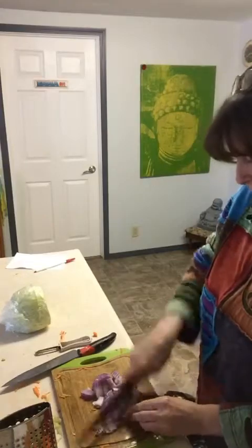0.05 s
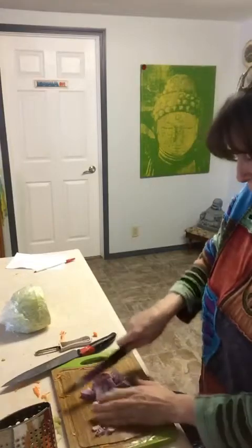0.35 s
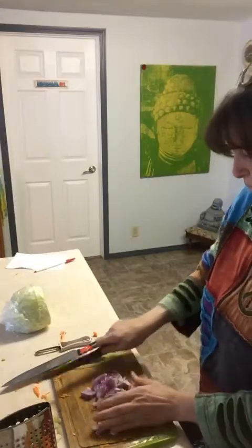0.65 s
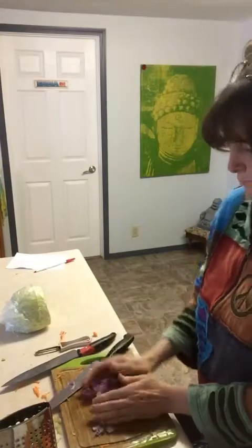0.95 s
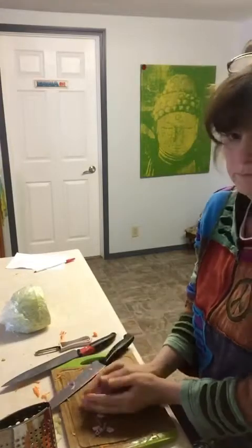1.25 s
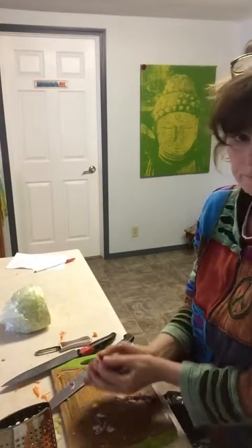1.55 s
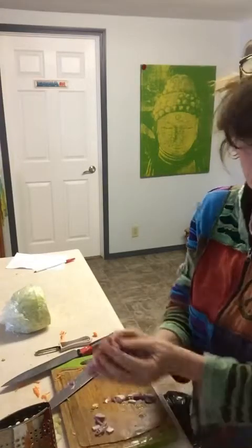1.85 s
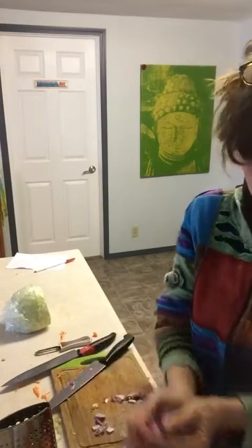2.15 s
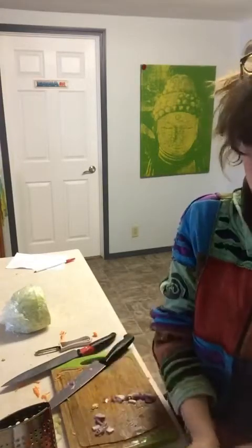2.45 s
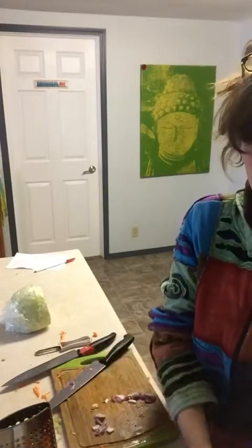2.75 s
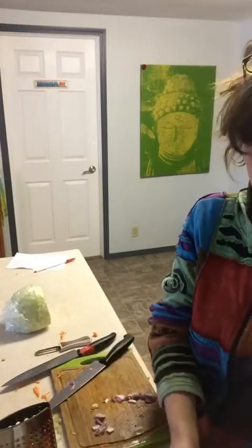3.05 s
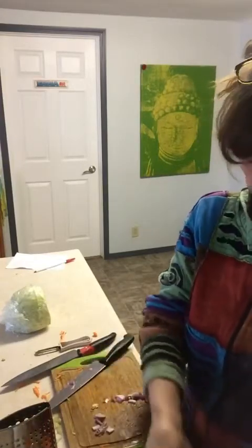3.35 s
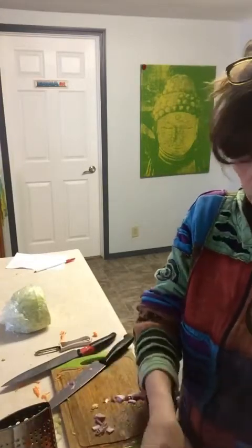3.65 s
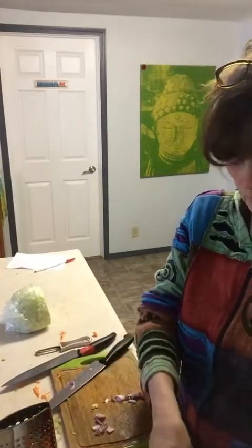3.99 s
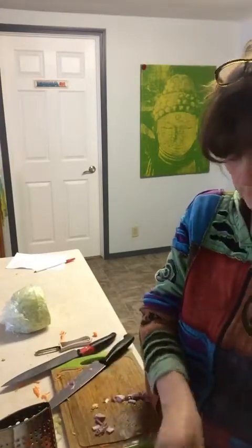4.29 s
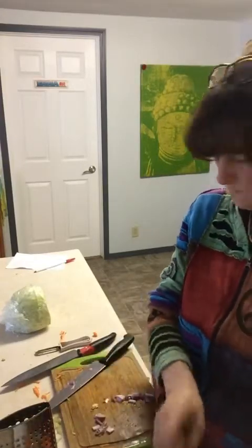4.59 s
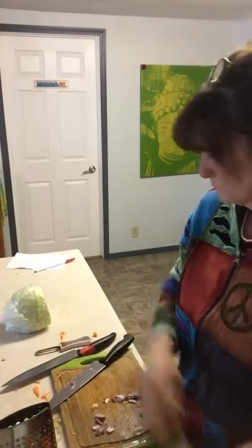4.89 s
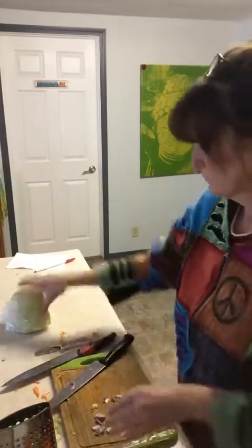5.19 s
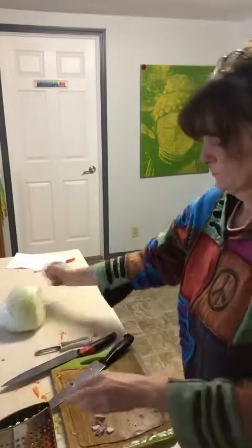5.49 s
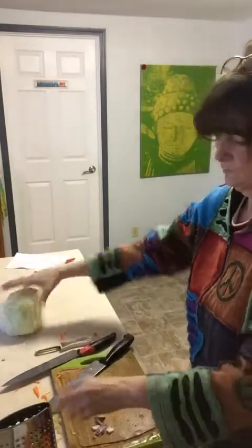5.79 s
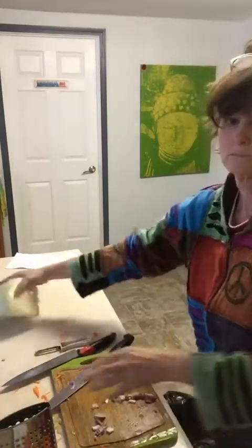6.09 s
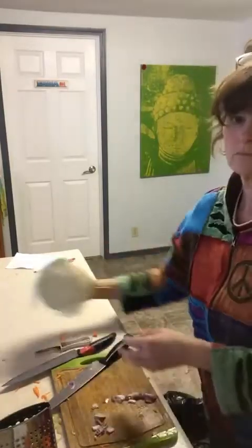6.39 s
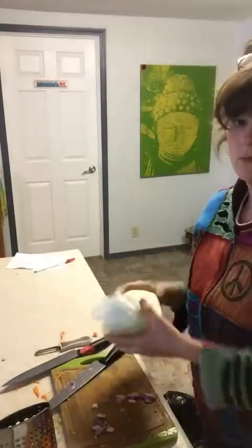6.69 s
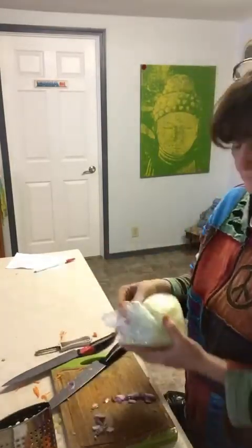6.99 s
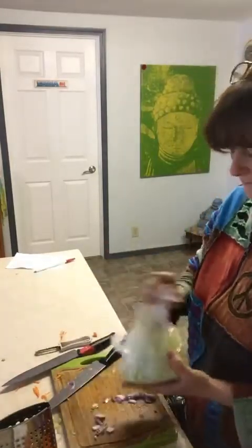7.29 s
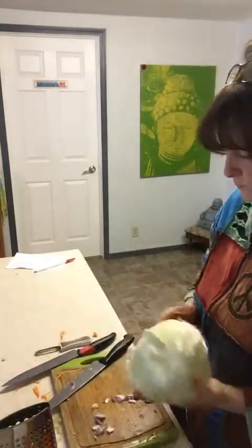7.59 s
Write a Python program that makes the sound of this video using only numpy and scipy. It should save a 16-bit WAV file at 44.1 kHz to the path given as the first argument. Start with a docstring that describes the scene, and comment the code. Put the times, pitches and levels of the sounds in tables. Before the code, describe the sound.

Close kitchen sounds: a steel knife set down on wood, soft scraps dropping into a lined bin, a dull thump and crinkling plastic film.

```python
"""A kitchen knife is put down with a clatter on a wooden board: the wood knocks and the steel rings.
Blade and hand scrape the board, then wet onion scraps patter into a lined bin and fingers rub clean.
A cabbage in plastic film thumps on the table and rocks, then crinkles as it is unwrapped.
All of it is close by, in a bare room with a few soft low thumps and a faint fridge hum."""
import sys
import numpy as np
from scipy import signal
from scipy.fft import rfft, irfft, next_fast_len
from scipy.io import wavfile
from scipy.ndimage import uniform_filter1d

SR = 44100
rng = np.random.default_rng(int(sys.argv[2]) if len(sys.argv) > 2 else 0)


def store_wav(level_fs):
    """Save 16-bit WAV to argv[1]."""
    pcm = np.round(np.clip(np.atleast_2d(level_fs), -1, 1) * 32767)
    wavfile.write(sys.argv[1], SR, pcm.T.astype(np.int16))


N = 336915
T = np.arange(N) / SR
ONE_SECOND = T[:SR]  # time axis of a single knock


def knife(crack_t60=0.023, thud_t60=0.18, load_s=0.0018, held_db=-30, free_db=-13, room_db=-11):
    """Handle and blade knock and bounce on the board. Returns the near sound and the room's share."""
    # each contact: t/s, level/dB, low cut/Hz, high cut/Hz, ring length/factor, relative table thud/dB
    contacts = [(0.2882, -56.5, 1800, 2000, 0.99, -30), (0.831, -12.5, 600, 2000, 0.88, -20),
                (0.8539, -26.5, 900, 2607, 1.9, -11), (0.9004, -36, 1000, 2030, 0.45, -1.5),
                (0.9284, -20.5, 3726, 6710, 1, -15), (0.9462, -28, 897, 2600, 0.38, -27),
                (.9530, -21, 1300, 2600, 0.69, -30), (0.9562, -18.5, 1200, 2600, 0.43, -28.5)]
    # dull tones of wood and handle: f/Hz, level/dB, t60/s (time to fade by 60 dB)
    board_tones = [(310, -21, 0.043), (600, -26.5, .07), (880, -11, .035), (1039, -9, 0.033),
                   (1265, -14.5, 0.027), (1470, 1.5, 0.019), (1760, -15, .02), (1957, -2.5, 0.022),
                   (2305, -10.5, .02), (2750, -1.5, 0.0081), (3530, -4.5, .009), (4190, -4, .007),
                   (4950, -4, .007), (5700, -5.5, .006), (6430, -6.5, 0.0088)]
    # ringing tones of the steel: f/Hz, level/dB, t60/s
    blade_tones = [(922, -9, .35), (953.3, 1.5, 0.47), (1027, -5.5, .4), (1270, -7, 0.43), (1254, -9.5, .3),
                   (1509, -13, .3), (1561, -14.5, 0.37), (1700, -12.5, 0.29), (1850, -9.5, 0.25),
                   (2120, -14, .35)]
    near, to_room = np.zeros(N), np.zeros(N)
    blade = unit_attack(ring(blade_tones))
    for start, db, low_hz, high_hz, length, thud_db in contacts:
        blade_db = free_db if start == contacts[-1][0] else held_db  # the hand lets go at the last one
        crack = cut(cut(noise(SR), 800, "high"), 7000, "low", order=1)
        crack *= undb(-2) * fade(crack_t60 * length)
        knock = ring(board_tones, length) + crack
        knock = cut(cut(knock, low_hz, "high", order=1), high_hz, "low")
        knock = unit_attack(knock * swell(load_s))  # the push on the wood takes a moment to build
        knock += undb(-32.5) * fade(0.042) * noise(SR)  # crumbs crushed under the knife
        rumble = cut(cut(noise(SR), 340, "low", order=3), 93, "high")
        thud = unit(rumble) * fade(thud_t60)
        add(near, start, undb(db) * (knock + undb(thud_db) * thud + undb(blade_db) * blade))
        add(to_room, start, undb(db + room_db) * knock)
    return near, to_room


def scrapes():
    """Blade and onion pieces catch on the grain of the wood thousands of times a second."""
    # each slide: full speed at t/s, level/dB, rise/s, hold/s, fall/s, treble lift/dB
    slides = [(0.0, -48, .01, 0.099, 0.018, 1.5), (1.219, -58, 0.17, 0.079, .08, 7),
              (1.37, -51, 0.043, 0.019, 0.034, 10.5)]
    # tone of rubbed wood: f/Hz, level/dB
    wood_colour = [(100, -6), (200, -1.5), (350, -4.5), (550, -14), (820, 0.5), (1100, 5), (1450, 0),
                   (1800, -4), (2600, -5), (5000, -18), (9000, -25.5), (15000, -35)]
    rub = unit(colour(clicks(per_second=4400, spread_db=3), wood_colour))
    return sum(undb(db) * stroke(at, rise, hold, fall) * brighten(rub, treble_db, corner_hz=4300)
               for at, db, rise, hold, fall, treble_db in slides)


def cabbage(crunch_t60=0.08, crunch_db_per_octave=6.5):
    """The cabbage lands, bounces and rocks; softer pushes sound duller and crunch the leaves less."""
    # each push on the table: t/s, thud level/dB, high cut/Hz
    pushes = [(5.328, -48.5, 60), (5.3544, -43, 55), (5.5731, -17.5, 1000), (5.589, -26.5, 600),
              (5.605, -25, 240), (5.619, -24, 200), (5.6455, -28.5, 1330), (5.671, -24, 140),
              (5.727, -36, 65), (5.803, -44.5, 180), (5.829, -43.5, 65), (5.88, -51.5, 200),
              (5.96, -50.5, 55.5)]
    # tones of the table top: f/Hz, level/dB, t60/s
    table_tones = [(68.7, -6, 0.25), (100.3, -9, 0.13), (140, -8, 0.18), (198, -8.5, 0.051),
                   (221.6, -15.5, 0.2), (299, 7.5, 0.033), (368, 8, 0.014), (578, -2, 0.03),
                   (649, -9, 0.03)]
    # tone of crunching leaves: f/Hz, level/dB
    leaf_colour = [(350, -29), (600, -4), (780, -5), (900, -4), (1250, -1), (1600, -5), (1900, -2.5),
                   (2600, -10.5), (3200, -12.5), (3700, -11), (5000, -23), (6400, -22.5), (8000, -31.5),
                   (10500, -31), (15500, -29)]
    out = np.zeros(N)
    for start, thud_db, push_hz in pushes:
        thud = cut(cut(ring(table_tones), push_hz, "low"), 57, "high")
        loudest = np.sqrt(np.max(uniform_filter1d(thud ** 2, size=SR // 100)))
        add(out, start, undb(thud_db) * thud / loudest)
        crunch = unit_attack(colour(noise(SR), leaf_colour) * fade(crunch_t60))
        crunch_db = thud_db - 4 + crunch_db_per_octave * np.log2(push_hz / 1000)
        add(out, start, undb(crunch_db) * crunch)
    return out


def film(snap_t60=0.01):
    """Plastic film crinkles as it is brushed and pulled off; a few large folds snap through."""
    # tone of the film: f/Hz, level/dB
    film_colour = [(100, -32), (220, -13), (340, -9), (450, -17), (720, -15.5), (1200, -7), (2000, -3.5),
                   (2600, -4), (3800, -3.5), (5000, -6.5), (6400, -5), (10400, -15.5), (13700, -12.5),
                   (15800, -16.5)]
    # loudness of the unwrapping: t/s, level/dB
    pull = [(6.81, -72), (6.922, -53.5), (7.018, -56), (7.03, -49.5), (7.204, -45.5), (7.212, -36.5),
            (7.408, -36.5), (7.448, -45.5), (7.518, -35.5), (7.534, -45.5), (7.64, -41)]
    # hands and table brush it: full speed at t/s, level/dB, rise/s, hold/s, fall/s, treble change/dB
    touches = [(5.363, -59, 0.073, 0.056, .11, 1), (5.562, -38, 0.025, 0.023, 0.029, -1),
               (5.957, -54, 0.0093, 0.0078, 0.049, 6.5), (5.997, -63, 0.038, 0.059, 0.27, -2),
               (6.255, -58, 0.051, 0.033, 0.037, 8.5), (6.702, -46, .02, 0.0046, 0.015, -3.5),
               (6.709, -57, 0.14, 0.05, .05, 1.5)]
    # large folds: t/s, level/dB, treble change/dB
    snaps = [(5.482, -44, 7.5), (7.2123, -45, -9), (7.25, -35, 6), (7.344, -38, -12), (7.3745, -30.5, -21),
             (7.3985, -37.5, -20), (7.4971, -38, 5), (7.6066, -39, -5)]
    crinkle = unit(colour(small_folds(), film_colour))
    pull_db = np.interp(T, *np.transpose(pull), left=-150, right=-150)
    out = undb(pull_db) * brighten(crinkle, db=2)
    for at, db, rise, hold, fall, treble_db in touches:
        out += undb(db) * stroke(at, rise, hold, fall) * brighten(crinkle, treble_db)
    for start, db, treble_db in snaps:
        snap = brighten(colour(noise(SR), film_colour), treble_db) * fade(snap_t60)
        add(out, start, undb(db) * unit_attack(snap))
    return out


def small_folds(hiss_db=-7, bunch_db=1.14, bunch_hz=55, flicker_db=3, flicker_hz=35):
    """Countless tiny folds of film buckle in bunches over a sliding hiss."""
    crackle = unit(unit(clicks(per_second=2600, spread_db=3)) + undb(hiss_db) * noise(N))
    crackle *= undb(bunch_db * wander(bunch_hz))
    # folds of different sizes come and go, so each half octave swells on its own
    bands_hz = np.geomspace(700, 16000, 10)
    size = next_fast_len(N, True)
    spectrum, out = rfft(crackle, size), np.zeros(N)
    freqs = np.linspace(0, SR / 2, len(spectrum))
    for share in np.eye(len(bands_hz)):
        band = irfft(spectrum * np.interp(freqs, bands_hz, share), size)[:N]
        out += band * undb(flicker_db * wander(flicker_hz))
    return out


def scraps(pat_t60=0.037, splash_db=-28):
    """Wet pieces pat on the bin liner, each with its own pitch; heavy lumps make the bin ring."""
    # falling pieces: t/s, level/dB, centre f/Hz, width/octaves
    pieces = [(2.5448, -58.5, 1370, 0.38), (2.6070, -50.5, 2200, 0.46), (2.6280, -55, 1720, 0.11),
              (2.6924, -36.5, 2310, 0.69), (2.7079, -42.5, 1740, 0.095), (2.7508, -49.5, 1500, 2.1),
              (2.795, -59.5, 2800, 0.44), (2.8668, -52, 3410, 1.03), (3.1047, -52, 2420, 0.83),
              (3.2863, -56, 3900, 0.39), (3.3299, -55.5, 3120, 0.65), (3.495, -53, 2270, 0.67),
              (3.926, -63.5, 2600, 1), (4.143, -63, 3500, .85)]
    # tone of the liner: f/Hz, level/dB
    liner_colour = [(1000, 7), (3200, 3), (4500, 1.5), (6500, 4), (9500, -1.5), (13000, 3.5), (16000, 2)]
    # heavy lumps landing: t/s, level/dB
    lumps = [(2.696, -45), (2.75, -50)]
    # tones of the bin: f/Hz, level/dB, t60/s
    bin_tones = [(138, -6, 0.2), (320, 5, 0.045), (488, 0, 0.11), (623, -1, 0.13), (756, -7, .1),
                 (1025, -2, 0.14), (1145, 9.5, 0.051)]
    out, octave = np.zeros(N), np.log2(np.arange(SR // 2 + 1) + 1)
    for start, db, hz, width in list(pieces) + crumbs():
        distance = (octave - np.log2(hz)) / width
        hump = np.exp(-distance ** 2 / 2) + undb(splash_db)  # one pitch range over a faint wide splash
        pat = colour(irfft(rfft(noise(SR)) * hump), liner_colour)
        add(out, start, undb(db) * unit_attack(pat * fade(pat_t60)))
    for start, db in lumps:
        add(out, start, undb(db) * unit_attack(ring(bin_tones)))
    return out


def crumbs(gap_s=0.03, centre_hz=3000, scatter_octaves=0.25, width_octaves=1):
    """Small bits fall at uneven moments and pitches. Returns more pieces for scraps()."""
    # spells of trickling: start/s, end/s, level/dB
    trickles = [(2.66, 2.86, -58.5), (3.309, 3.37, -60), (4.089, 4.19, -67)]
    pieces = []
    for start, end, db in trickles:
        for slot in np.arange(start, end, gap_s):
            lands = slot + gap_s * rng.random()
            hz = centre_hz * 2 ** (scatter_octaves * rng.standard_normal())
            pieces.append((lands, db, hz, width_octaves))
    return pieces


def fingers(rub_db=-62.5):
    """Wet fingers rub off the last scraps; the skin sticks and slips in rising squeaks."""
    # the rubbing movement: full speed at t/s, rise/s, hold/s, fall/s
    movement = (3.38, .3, .05, .16)
    # tone of rubbed skin: f/Hz, level/dB
    skin_colour = [(1200, -4), (2300, -9), (3700, -4), (5300, -5), (7000, -5), (9000, -12.5), (11000, -15),
                   (13400, -3), (15200, -9.5), (15800, -9)]
    # squeaks: middle t/s, level/dB, starting f/Hz, climb/Hz, length/s, pitch wobble/fraction
    squeaks = [(3.391, -65.5, 3210, 2570, 0.22, 0.08), (3.508, -56, 2084, 100, 0.06, 0.11),
               (4.131, -61.5, 3140, 446, 0.064, 0.04)]
    rub = unit(colour(clicks(per_second=3200, spread_db=4.5), skin_colour))
    out = undb(rub_db) * stroke(*movement) * rub
    for middle, db, hz, climb_hz, length, wobble in squeaks:
        progress = np.linspace(0, 1, int(length * SR))
        slip = 1 + wobble * wander(592, SR)[:len(progress)]
        pitch_hz = (hz + climb_hz * progress) * slip
        squeak = np.sin(np.pi * progress) * np.sin(2 * np.pi * np.cumsum(pitch_hz) / SR)
        add(out, middle - length / 2, undb(db) * squeak)
    return out


def low_thumps(boom_hz=66, boom_t60=0.24):
    """Soft low thumps from the knife's knocks, landing lumps, footfalls and other small bumps."""
    # soft bumps: t/s, level/dB
    bumps = [(0.0, -39.5), (.06, -48), (0.501, -51.5), (.86, -40), (.94, -43.5), (1.171, -51), (2.715, -45),
             (2.767, -47.5), (3.489, -50.5), (3.807, -46), (3.938, -51.5)]
    out = np.zeros(N)
    boom = cut(np.sin(2 * np.pi * boom_hz * ONE_SECOND) * fade(boom_t60), 160, "low")
    for start, db in bumps:
        add(out, start, undb(db) * boom)
    return out


def room(build_s=0.0036):
    """How bare walls answer a click: a few echoes and a dense tail whose top treble dies first."""
    # how long the room rings: f/Hz, t60/s
    ring_times = [(100, 0.29), (400, 0.46), (1200, 0.46), (2500, 0.37), (4500, .45), (6500, 0.48),
                  (9000, .28), (15000, 0.11)]
    # echoes off walls and ceiling: delay/s, level/dB
    echoes = [(.0095, -6), (0.0226, -9.5), (0.0311, -11.5)]
    hz, t60s = np.transpose(ring_times)
    spectrum, log_freqs = rfft(noise(SR)), np.log(np.arange(SR // 2 + 1) + 1)
    tail = sum(irfft(spectrum * np.interp(log_freqs, np.log(hz), share)) * fade(t60)
               for share, t60 in zip(np.eye(len(hz)), t60s))
    tail = unit(tail * swell(build_s)) / np.sqrt(SR)
    for delay, db in echoes:
        add(tail, delay, undb(db) * np.hanning(5) / 2)
    return tail


def air_and_fridge(air_db=-64, waver=0.3):
    """Still room air and the wavering hum of a fridge."""
    # tone of the air: f/Hz, level/dB
    air_colour = [(15, -58.5), (25, -32), (48, -3.5), (68, -5), (82, -9.5), (102, -5), (241, -6.5),
                  (269, -11.5), (352, -6), (437, -12.5), (486, -13.5), (769, -15.5), (1360, -21.5),
                  (1930, -22.5), (15800, -37)]
    # tones of the fridge: f/Hz, level/dB
    hum_tones = [(59.2, -69.5), (118.5, -80.5), (172.3, -77.5), (204.6, -77), (242.2, -79), (354.5, -75),
                 (705.2, -81.5), (764.4, -79.5)]
    out = undb(air_db) * unit(colour(noise(N), air_colour))
    for hz, db in hum_tones:
        drift = wander(3)
        out += undb(db) * np.sqrt(2) * (1 + waver * drift) * np.sin(2 * np.pi * hz * T + drift)
    return out


def undb(db):
    """Turn decibels into a gain."""
    return 10 ** (np.asarray(db) / 20)


def unit(x):
    """Scale to an average (rms) level of 1."""
    return x / np.sqrt(np.mean(x ** 2))


def unit_attack(x):
    """Scale a knock so its first hundredth of a second has an average level of 1."""
    return x / np.sqrt(np.mean(x[:SR // 100] ** 2))


def noise(samples):
    """An even hiss (white noise)."""
    return rng.standard_normal(samples)


def wander(hz, samples=N):
    """A random wobble, mostly slower than hz."""
    return unit(cut(noise(samples), hz, "low"))


def clicks(per_second, spread_db):
    """Tiny clicks at random moments, most of them small."""
    hits = rng.random(N) < per_second / SR
    signs = rng.choice([-1, 1], N)
    return hits * signs * undb(spread_db * np.minimum(rng.exponential(size=N), 4))


def ring(tones, length=1):
    """Fading tones struck together; neighbours swing in opposite directions."""
    return sum((-1) ** k * undb(db) * fade(t60 * length) * np.sin(2 * np.pi * hz * ONE_SECOND)
               for k, (hz, db, t60) in enumerate(tones))


def swell(seconds):
    """A gain that rises from 0 towards 1."""
    return 1 - np.exp(-ONE_SECOND / seconds)


def fade(t60):
    """A gain that drops 60 dB in t60 seconds."""
    return np.exp(-np.log(1000) * ONE_SECOND / t60)


def stroke(at, rise, hold, fall, depth_db=20.5):
    """Gain of one rub: it climbs depth_db in the rise time, holds, and drops as much in the fall time."""
    early, late = np.maximum(at - T, 0), np.maximum(T - at - hold, 0)
    return undb(-depth_db * (early / rise + late / fall))


def add(out, seconds, x):
    """Mix x into out at the given time."""
    start = max(int(seconds * SR), 0)
    out[start:start + len(x)] += x[:N - start]


def colour(x, points):
    """Shape the tone along a curve of (f/Hz, level/dB) points."""
    hz, db = np.transpose(points)
    size = next_fast_len(len(x), True)
    freqs = np.fft.rfftfreq(size, 1 / SR) + 1
    gain = undb(np.interp(np.log(freqs), np.log(hz), db))
    return irfft(rfft(x, size) * gain, size)[:len(x)]


def cut(x, hz, keep, order=2):
    """Keep the "low" or the "high" side of hz."""
    return signal.sosfilt(signal.butter(order, hz, keep, fs=SR, output="sos"), x)


def brighten(x, db, corner_hz=8000):
    """Raise or lower the treble; filtering forwards and backwards keeps it in step."""
    treble = cut(cut(x, corner_hz, "high")[::-1], corner_hz, "high")[::-1]
    return x + (undb(db) - 1) * treble


def scene():
    """Mix the sources; the board is nearest, the cabbage and the bin come more through the room."""
    knocks, to_room = knife()
    rubs, thuds = scrapes(), cabbage()
    at_bin, wrap = scraps() + fingers(), film()
    to_room += undb(-13) * rubs + undb(-7) * cut(thuds, 110, "high")
    to_room += undb(-9) * at_bin + undb(-10.5) * wrap
    near = knocks + rubs + thuds + at_bin + wrap + low_thumps()
    reverb = signal.fftconvolve(to_room, room())[:N]
    return (near + reverb + air_and_fridge())[None]


def record(dry, bass_hz=38, ceiling=0.94, top_hz=15900):
    """Drop the deepest bass, round off the hardest knocks and cut the highest treble."""
    rounded = ceiling * np.tanh(cut(dry, bass_hz, "high") / ceiling)
    return signal.sosfilt(signal.ellip(10, 0.2, 70, top_hz, fs=SR, output="sos"), rounded)


dry = scene()
out = record(dry)
store_wav(out)
```